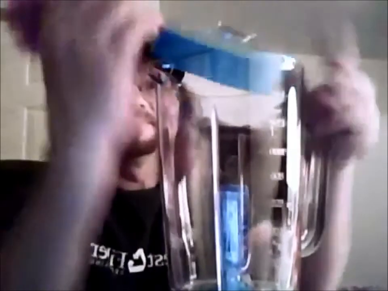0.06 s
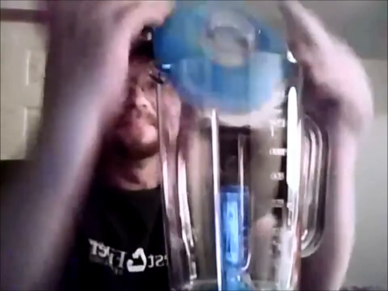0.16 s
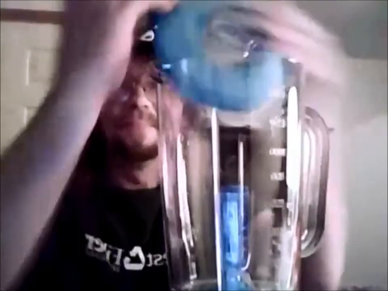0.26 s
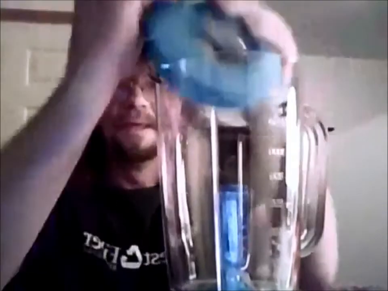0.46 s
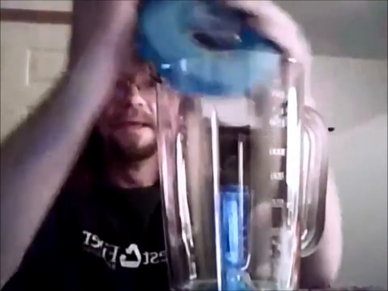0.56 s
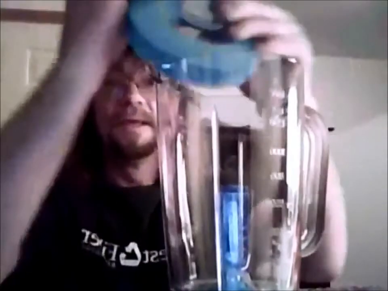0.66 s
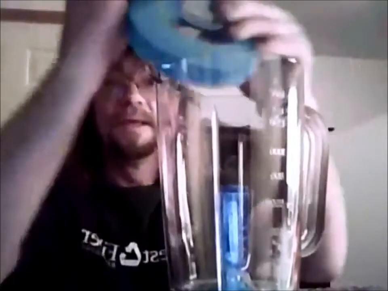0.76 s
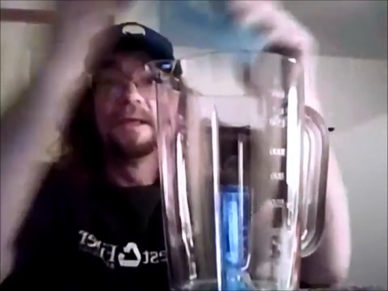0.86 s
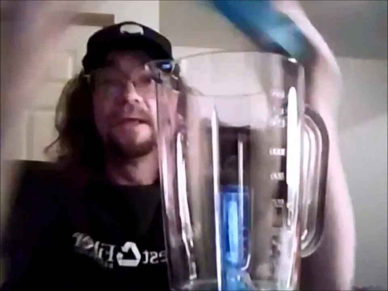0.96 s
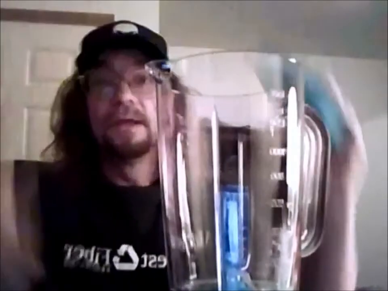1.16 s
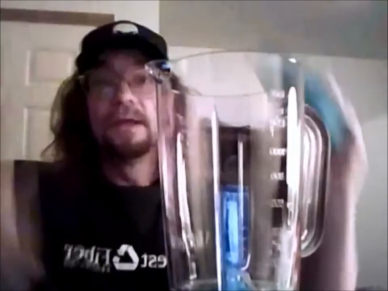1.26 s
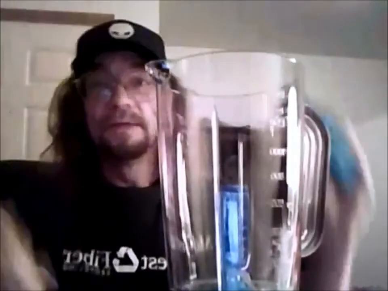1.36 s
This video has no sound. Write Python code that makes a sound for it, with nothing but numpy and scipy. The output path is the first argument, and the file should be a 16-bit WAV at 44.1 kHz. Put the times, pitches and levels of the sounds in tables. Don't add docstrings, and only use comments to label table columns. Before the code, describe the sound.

Hard plastic lid pulled from a glass jar, a hollow knock then loose cap clattering briefly

```python
import sys
import numpy as np
from scipy import signal
from scipy.fft import rfft, irfft, next_fast_len
from scipy.io import wavfile
from scipy.ndimage import map_coordinates

SR = 44100
rng = np.random.default_rng(int(sys.argv[2]) if len(sys.argv) > 2 else 0)


def dump(signal):
    limited = np.clip(np.atleast_2d(signal).T, -1, 1)
    pcm = np.round(limited * 32767).astype(np.int16)
    wavfile.write(sys.argv[1], SR, pcm)


def attenuation_scalar(level_db):
    decades = np.asarray(level_db, float) / 20
    return 10 ** decades


N = 61739
GRAIN = 2 ** 14

# frequency in Hz, density in dB per Hz.
AIR_SPECTRUM = [(13, -79), (22, -8), (124, -11), (249, -10.5), (283, -23.5), (357, -15), (487, -22.5),
                (568, -21.5), (10500, -52), (13600, -97), (22000, -120)]
# centre in Hz, width in Hz, level in dB.
HUM_BANDS = [(120, 19.5, -59.5), (239.5, 16, -70), (365, 10, -75), (589, 120, -67.5)]
AIR_DB = -48.5
MOTOR_HZ, MOTOR_DB, MOTOR_SWAY_DB = 79.4, -53, 2.5

# start in seconds, peak in dB, favoured pitch in Hz,
# chatter decay (t60) in seconds, treble in dB.
RIM_CONTACTS = [(.002, -41, 2600, 0.14, -9.5), (.035, -49.5, 2010, 0.23, -23),
                (.059, -46, 2040, 0.15, -11.5), (0.099, -40.5, 1350, 0.42, -13.5),
                (.136, -45, 2280, 0.1, -14), (0.171, -46, 2370, .03, -7.5), (.203, -31, 637, 0.071, -14),
                (.208, -31.5, 2170, 0.021, -19), (.219, -29.5, 1073, 0.056, -36), (.25, -49, 2460, 0.36, 5),
                (0.3276, -14.5, 1100, 0.035, 3.5), (0.3297, -13, 2540, 0.005, -4),
                (0.3334, -17.5, 1834, 0.038, -8), (.337, -19.5, 1030, 0.043, -9),
                (0.341, -21.5, 1890, 0.012, -21), (0.346, -26, 1880, 0.022, -17),
                (0.359, -30, 6040, 0.04, -20.5), (0.412, -33, 2465, 0.035, -9.5)]
# start in seconds, peak in dB,
# favoured pitch in Hz, chatter decay (t60) in seconds, treble in dB.
CAP_RATTLE = [(.4567, -19.5, 1397, 0.013, -12), (0.4583, -33.5, 7430, 0.012, -7),
              (.4587, -18, 2523, 0.016, -13.5), (.4622, -19, 1367, 0.0061, -13),
              (.469, -27, 2360, .006, -13.5), (.4832, -23, 2105, 0.0049, -21),
              (.494, -22.5, 1404, 0.013, -25), (.497, -26.5, 1202, .008, -10.5),
              (.5005, -29, 993, 0.0083, -8), (.5025, -27, 2210, 0.015, 1), (.5055, -19, 2330, 0.0065, -7),
              (.514, -27, 1404, 0.014, -15), (.5162, -20, 2365, .01, -10.5),
              (.523, -27, 2550, 0.024, -14.5), (.5317, -24, 2093, 0.0042, -27),
              (.536, -31.5, 2240, .02, -12), (0.5751, -30, 3170, 0.011, -23.5),
              (.5765, -31, 4740, 0.02, -16.5), (.675, -33.5, 1446, 0.0074, -47),
              (.6775, -30.5, 1375, 0.014, -31), (.7105, -41.5, 2110, 0.019, -39),
              (.7115, -42.5, 4700, .01, -28), (0.7564, -38, 4130, 0.035, -12.5),
              (0.7798, -28.5, 2240, 0.0072, -22.5),
    (0.785, -36, 840, 0.016, -19),
    (0.7904, -34.5, 1175, 0.013, -38),
    (0.793, -33.5, 3430, 0.013, -22),
    (.81, -32, 1900, .012, -34),
    (0.8218, -30, 1950, .004, -28),
    (0.825, -37, 2440, 0.012, -32),
    (.848, -46, 1800, 0.026, -31),
    (.86, -45, 1970, 0.045, -21),
]
LID_MODE_HZ = [720, 1000, 1175, 1390, 1830, 2110, 2290, 2500, 2850, 3300, 4210, 5150, 5950, 7560]
# width in Hz, level in dB.
LID_MODES = [(216, 0), (60.3, 9.5), (65, 2.5), (81, 10), (90, 3.5), (89.5, 9.5), (110, 9), (88.6, 11.5),
             (300, -2.5), (248, 3.5), (710, 3), (206, 9.5), (700, -4), (1220, -1)]
MODE_COUNT = len(LID_MODES)
MODE_SCATTER_DB, DETUNE = 3, .006
SPOT_DB, SPOT_WIDTH = 7, .045
CRACK_DB, SOFT_HZ = -11, 3000
FAVOUR_WIDTH, FAVOUR_FLOOR = .6, .22
SPIKE, CHATTER_GRAIN_DB = 8, 4

# start in seconds, frequency in Hz, length in seconds, level in dB.
JAR_ROCKS = [(0.065, 25, 0.036, -44), (0.077, 80, 0.059, -39), (0.26, 36, 0.084, -47),
             (0.45, 35, 0.048, -41), (.36, 82, 0.084, -37.5), (0.59, 74, 0.084, -57.5),
             (1.2, 210, 0.062, -58), (.126, 1030, 0.062, -47.5), (0.104, 920, 0.025, -51),
             (.362, 398, 0.043, -37.5), (0.352, 1010, 0.028, -45)]
# start in seconds, low mode in Hz, its level in dB,
# upper mode in Hz, its level in dB.
AIR_PUSHES = [(0.095, 140.2, -43.5, 365, -52), (0.111, 141, -59, 365, -38), (0.203, 120, -49, 553, -29),
              (.204, 116, -50, 678, -38.5), (0.207, 161.6, -41.5, 372, -30), (0.223, 131, -39, 365, -34),
              (0.267, 167, -41, 365, -36), (0.328, 131.9, -21, 396, -16), (0.335, 161.5, -28.5, 284, -32.5),
              (0.33, 109, -62, 589.4, -25.5), (.345, 112, -33, 469, -30), (0.382, 168, -39, 374.6, -27),
              (.46, 125, -73, 419, -37.5), (0.504, 137.3, -48, 403.6, -37), (.53, 154, -47, 395, -39),
              (0.712, 122.5, -56, 367, -40), (0.834, 136, -46, 375, -76)]
PUSH_RISE_S, LOW_FADE_S, UPPER_T60_S = 0.0016, 0.047, 0.087

# start in seconds, length in seconds, level in dB, centre in Hz.
SEAL_RUBS = [(0.1183, 0.018, -40.5, 4220), (0.12, 0.02, -53, 2400), (0.2, 0.043, -48.5, 1850),
             (0.2046, 0.032, -49.5, 3600), (0.207, 0.02, -61, 5000), (.455, 0.012, -46.5, 8600),
             (.406, .018, -51, 3700), (.298, .021, -46, 5000), (.299, .008, -43, 2450),
             (.331, .045, -43, 5300), (0.483, 0.078, -44, 2500), (0.54, 0.021, -47, 1130),
             (0.583, 0.12, -60.5, 2730), (0.684, 0.062, -58, 2060), (0.753, 0.023, -43, 2140),
             (0.76, 0.0054, -57.5, 4100), (.752, 0.034, -59, 1600), (0.4904, 0.052, -44.5, 4900),
             (0.76, 0.075, -61.5, 4250), (1.07, 0.31, -74.5, 3160), (1.196, .07, -80, 7600)]
RUB_GRAIN_DB, RUB_WIDTH, RUB_RING_DB = 3, .8, -4

# frequency in Hz, decay time (t60) in seconds.
ROOM_DECAY = [(200, 0.61), (2000, 0.19), (9000, 0.25)]
ROOM_DB = -9

DIP_TIMES = [.3265, .4555]
DIP_DB, DIP_AHEAD_S, DIP_HZ = -13, .007, 1000
TOP_HZ, TOP_FALL_HZ = 10300, 300


def unit(x):
    return x / np.sqrt(np.mean(x ** 2) + 1e-20)


def along(points, hz):
    f, value = np.transpose(points)
    return np.interp(np.log(hz + 1), np.log(f + 1), value)


def filtered(x, response):
    length = x.shape[-1]
    m = next_fast_len(length + SR // 2)
    return irfft(rfft(x, m) * response(np.fft.rfftfreq(m, 1 / SR)), m)[..., :length]


def peak(f, hz, width):
    return 1j * f * width / (hz * hz - f * f + 1j * f * width)


def wobble(rate):
    knots = rng.standard_normal(int(N * rate / SR) + 4)
    return map_coordinates(knots, [np.arange(N) * rate / SR])


def background():
    air = unit(filtered(rng.standard_normal(N), lambda f: attenuation_scalar(along(AIR_SPECTRUM, f))))
    air_level = attenuation_scalar(AIR_DB - 6 + wobble(8))
    hum = np.zeros(N)
    for hz, width, db in HUM_BANDS:
        band = filtered(rng.standard_normal(N), lambda f: peak(f, hz, width) ** 2)
        hum += attenuation_scalar(db) * unit(band)
    motor_level = attenuation_scalar(MOTOR_DB + MOTOR_SWAY_DB * wobble(22))
    motor_phase = 2 * np.pi * np.cumsum(MOTOR_HZ + 2.3 * wobble(15)) / SR
    return air_level * air + hum + motor_level * np.sin(motor_phase)


def lid(f, scatter_db, treble_db, spot_hz=1000, spot_db=-60, shift=np.zeros(MODE_COUNT)):
    response = attenuation_scalar(spot_db) * peak(f, spot_hz, SPOT_WIDTH * spot_hz)
    response = response + attenuation_scalar(CRACK_DB) * 1j * f / (600 + 1j * f)
    for k, (width, db) in enumerate(LID_MODES):
        mode = peak(f, LID_MODE_HZ[k] * (1 + DETUNE * shift[k]), width)
        response = response + (-1) ** k * attenuation_scalar(db + scatter_db[k]) * mode
    low = 1 / (1 + np.sqrt(2) * 1j * f / SOFT_HZ - (f / SOFT_HZ) ** 2)
    hardness = low + attenuation_scalar(treble_db / 2 + 3) * (1 - low)
    return response * hardness ** 2


def contacts():
    out, t = np.zeros(N + GRAIN), np.arange(GRAIN) / SR
    for s, db, hz, t60, treble_db in RIM_CONTACTS + CAP_RATTLE:
        bounce_db = CHATTER_GRAIN_DB * (rng.standard_normal(GRAIN) - 0.5)
        chatter = rng.standard_normal(GRAIN) * attenuation_scalar(bounce_db - 60 * t / t60)
        chatter[0] = -SPIKE
        scatter_db = MODE_SCATTER_DB * rng.standard_normal(MODE_COUNT)
        shift = rng.standard_normal(MODE_COUNT)

        def struck_lid(f):
            favour = FAVOUR_FLOOR + peak(f, hz, FAVOUR_WIDTH * hz)
            return lid(f, scatter_db, treble_db, hz, SPOT_DB, shift) * favour

        ring = filtered(chatter, struck_lid)
        out[round(s * SR):][:GRAIN] += attenuation_scalar(db) * ring / abs(ring).max()
    return out[:N]


def jar():
    out, t = np.zeros(N + GRAIN), np.arange(GRAIN) / SR
    for s, hz, length, db in JAR_ROCKS:
        swing = np.sin(np.pi * np.clip(t / length, 0, 1)) ** 2
        out[round(s * SR):][:GRAIN] += attenuation_scalar(db) * swing * np.sin(2 * np.pi * hz * t)
    rise = 1 - np.exp(-t / PUSH_RISE_S)
    low_fade = np.exp(-(t / LOW_FADE_S) ** 2)
    for s, low_hz, low_db, upper_hz, upper_db in AIR_PUSHES:
        low = attenuation_scalar(low_db) * low_fade * np.sin(2 * np.pi * low_hz * t)
        upper = attenuation_scalar(upper_db - 60 * t / UPPER_T60_S) * np.sin(2 * np.pi * upper_hz * t)
        out[round(s * SR):][:GRAIN] += rise * (low - upper)
    return out[:N]


def rubs():
    out, t = np.zeros(N), np.arange(N) / SR
    for s, length, db, hz in SEAL_RUBS:
        grit = rng.standard_normal(N) * attenuation_scalar(RUB_GRAIN_DB * wobble(600))
        progress = np.clip((t - s) / length, 0, 1)
        stroke = grit * np.sin(np.pi * progress ** 0.7)

        def rubbed_lid(f):
            ringing = attenuation_scalar(RUB_RING_DB) * lid(f, np.zeros(MODE_COUNT), -15)
            return peak(f, hz, RUB_WIDTH * hz) ** 2 * (0.042 + ringing)

        out += attenuation_scalar(db) * unit(filtered(stroke, rubbed_lid)) * np.sqrt(length * SR / N)
    return out


def room(x):
    hz, t, z = signal.stft(rng.standard_normal(SR // 2), SR, nperseg=256)
    decay = attenuation_scalar(-60 * t / along(ROOM_DECAY, hz)[:, None])
    tail = signal.istft(z * decay, SR, nperseg=256)[1]
    delayed = np.pad(x, (250, 0))
    return signal.fftconvolve(delayed, tail / np.linalg.norm(tail))[:N]


def scene():
    near = contacts() + rubs()
    return (near + jar() + attenuation_scalar(ROOM_DB) * room(near) + background())[None]


def low_pass(x):
    return signal.sosfilt(signal.butter(12, 11020, fs=SR, output="sos"), x)


def record(dry):
    t = np.arange(N) / SR
    dip = np.zeros(N)
    for s in DIP_TIMES:
        approach = np.clip(1 - (s - t) / DIP_AHEAD_S, 0, 1) ** 2.7
        dip += approach * (t < s - .001)
    treble = filtered(dry, lambda f: f * f / (f * f + DIP_HZ ** 2))
    dipped = dry + (attenuation_scalar(DIP_DB * dip) - 1) * treble
    mix = filtered(dipped, lambda f: attenuation_scalar(-20 * np.clip((f - TOP_HZ) / TOP_FALL_HZ, 0, 3)))
    return low_pass(mix)


dry = scene()
out = record(dry)
dump(out)
```